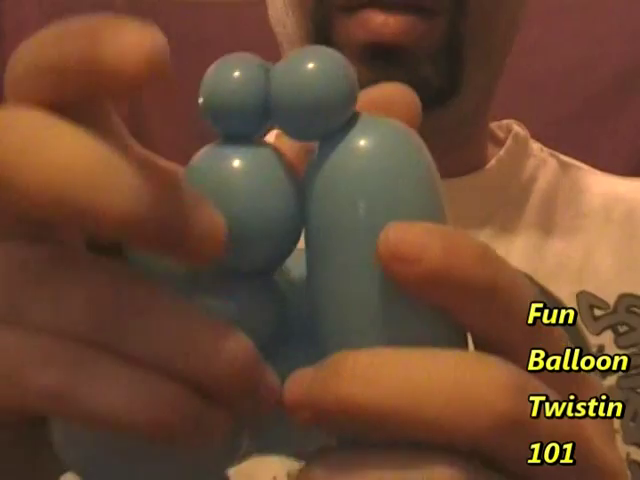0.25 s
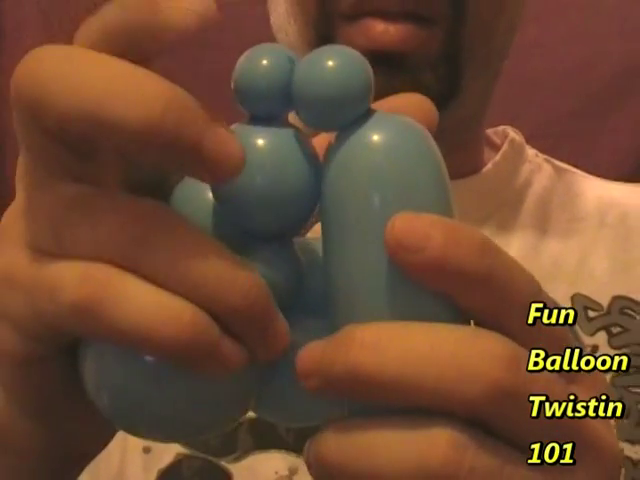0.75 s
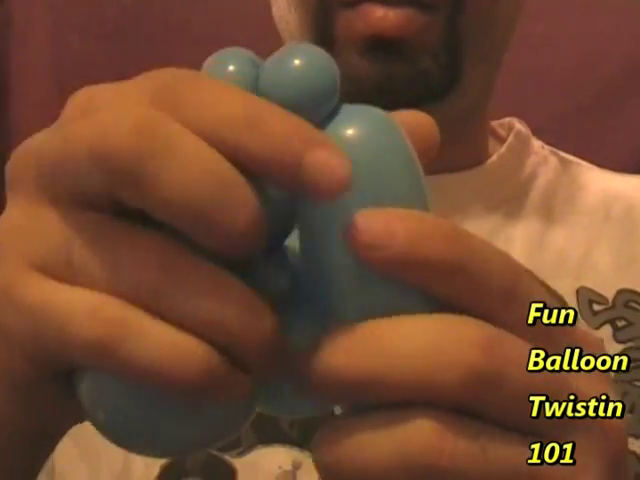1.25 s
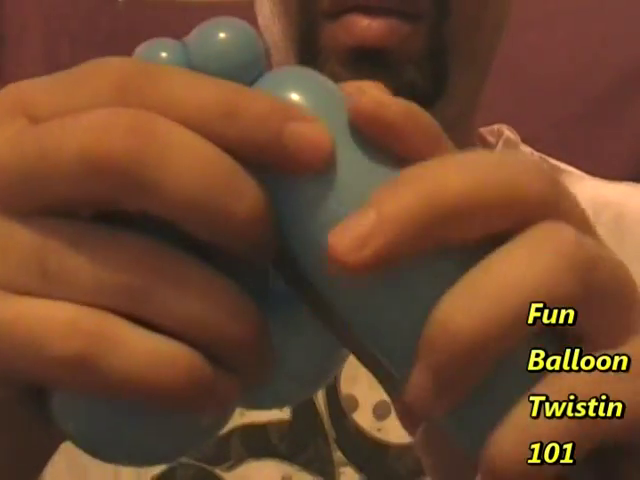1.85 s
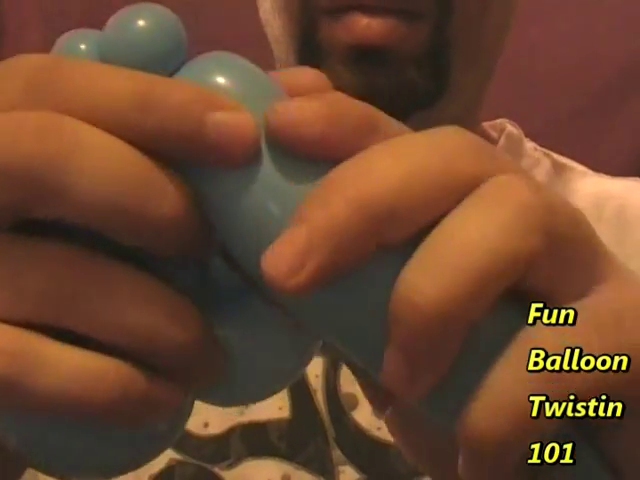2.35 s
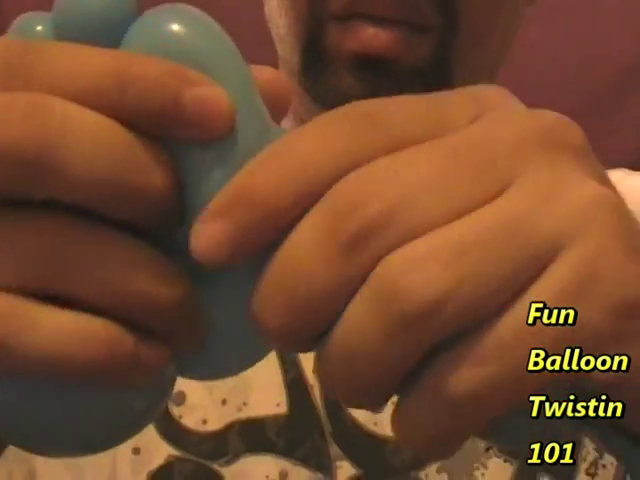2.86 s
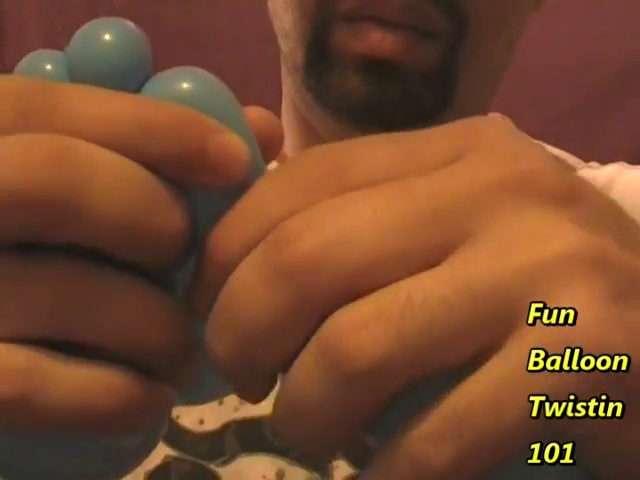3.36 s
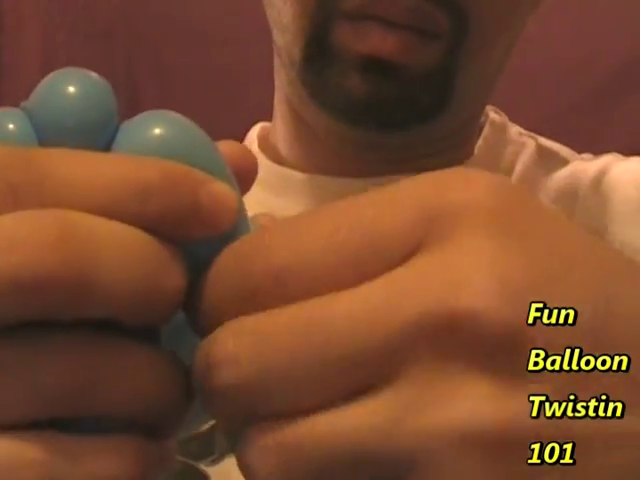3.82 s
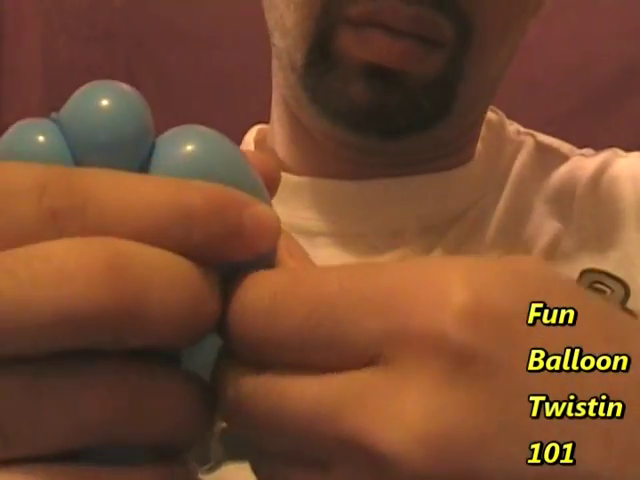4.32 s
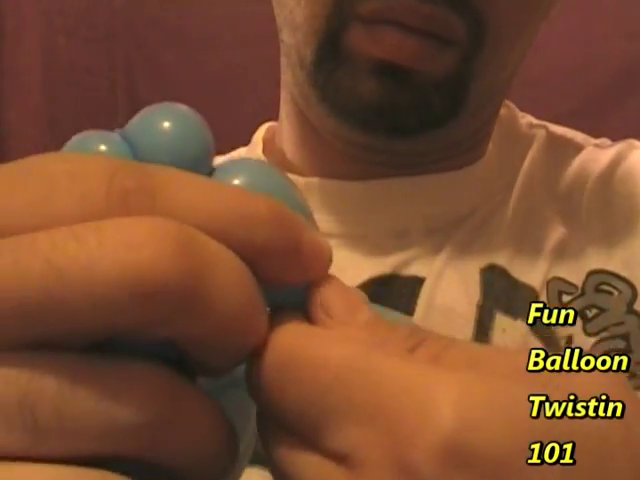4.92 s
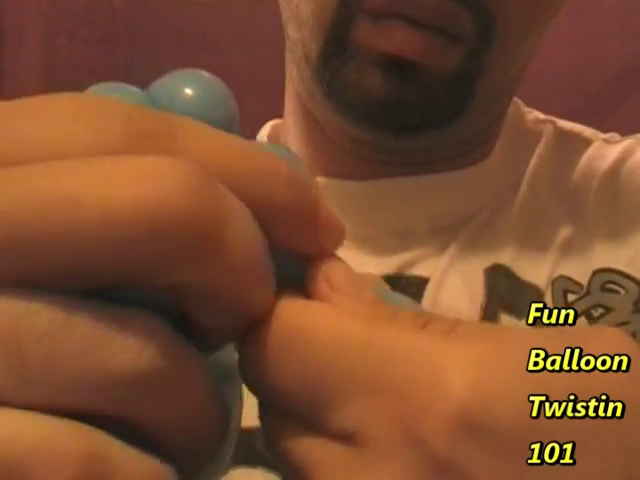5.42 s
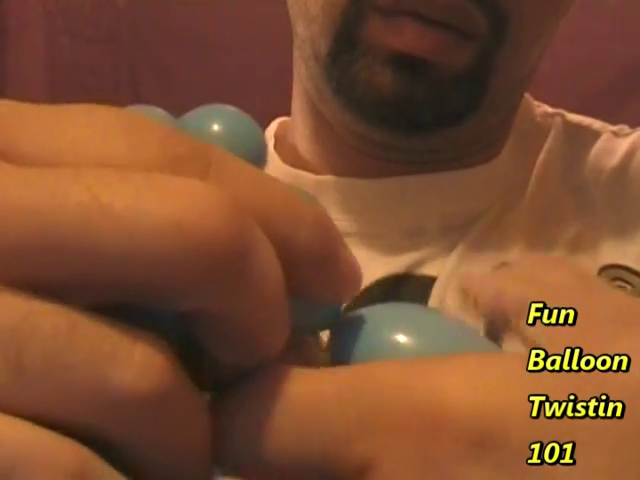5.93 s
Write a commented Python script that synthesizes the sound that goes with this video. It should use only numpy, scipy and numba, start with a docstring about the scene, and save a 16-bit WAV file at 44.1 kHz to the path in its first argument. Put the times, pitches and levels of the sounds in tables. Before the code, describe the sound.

A long latex balloon is gripped and twisted close to a stereo microphone in a small, fairly dry room. Soft hollow rubs and scattered ticks come first, with one sharp snap before a near-quiet gap. Then strong creaks and squeaky rubs follow almost without pause, thin into brighter crackle, nearly fade, and return in a loud cluster of snaps and rubbing.

```python
"""A small, fairly dry room: fingers squeeze and twist a long latex balloon close to two microphone ports.
The rubber sticks and slips, and each slip excites short, heavily damped modes of the taut skin.
Uneven slips make the rubbing and crackle, single hard ones snap, regular runs creak and squeak.
Brief gliding sines are sung notes; low judders thump the body. Air modes add a hollow ring, and a short
noise tail and a steady room tone surround it all."""
import sys
import numpy as np
from scipy import signal
from scipy.fft import rfft, irfft
from scipy.io import wavfile
from scipy.ndimage import uniform_filter1d
from numba import njit

SR = 44100
rng = np.random.default_rng(int(sys.argv[2]) if len(sys.argv) > 2 else 0)


def output_pcm(signal):
    """Save a mono or channel-first signal as 16-bit PCM at the path in sys.argv[1].

    Samples are clipped to [-1, 1] before scaling.
    """
    pcm = np.clip(np.atleast_2d(signal).T, -1, 1) * 32767
    wavfile.write(sys.argv[1], SR, np.round(pcm).astype(np.int16))


N = 272538  # length [samples]
SLIP_SPAN_S = .004  # reference span that ties slip level to slip rate


def undb(db):
    """Turn decibels into an amplitude gain."""
    return 10 ** (np.asarray(db) / 20)


def on_log_axis(hz, points, axis=1):
    """Read one column of a (frequency [Hz], ..) table, interpolating along log frequency."""
    points = np.array(points, float)
    return np.interp(np.log(np.maximum(hz, 1)), np.log(points[:, 0]), points[:, axis])


def coloured(x, points):
    """Filter a sound by a (frequency [Hz], level [dB]) table and bring it to rms 1."""
    size = x.shape[-1]
    gain = undb(on_log_axis(np.fft.rfftfreq(size, 1 / SR), points))
    y = irfft(rfft(x) * gain, size)
    return y / np.sqrt(np.mean(y ** 2))


def room_tone():
    """Low steady noise of the still room, independent at each port."""
    # spectrum shape of the still room: (frequency [Hz], relative level [dB per Hz])
    tone_spectrum = [(25, -13.5), (70, -1), (140, -2.5), (200, -0.5), (330, -5), (420, -8.5), (1000, -12),
                     (1500, -17), (5000, -26.5), (15000, -45)]
    level_db = -54  # rms
    return undb(level_db) * coloured(rng.standard_normal((2, N)), tone_spectrum)


def room(x, wet_db, t60_s, side_db, build_s):
    """Hands, chest and near walls return a short dense tail, nearly the same at both ports."""
    t = np.arange(SR // 3) / SR
    noise = rng.standard_normal((2, len(t)))
    fade = (1 - np.exp(-t / build_s)) * np.exp(-np.log(1000) * t / t60_s)
    # tail colours: (frequency [Hz], relative level [dB])
    mid = coloured(noise[0], [(100, 26), (400, -3), (1500, 6.5), (4000, 5), (8000, 2), (15000, 0.0)])
    side = coloured(noise[1], [(100, -20.5), (1000, 3.0), (3000, 0.0), (8000, 7.5), (15000, 7)])
    side = side * undb(side_db)
    tail = np.array([mid + side, mid - side]) * fade / np.sqrt(np.sum(fade ** 2))
    return x + signal.fftconvolve(x[None], undb(wet_db) * tail, axes=1)[:, :N]


def air(x):
    """The skin drives a few narrow air resonances, which give the low slips their hollow ring."""
    # air in and round the balloon: (frequency [Hz], width [Hz], added level [dB])
    air_modes = [(190, 34, 4), (345, 24, -1), (496, 36, -13), (790, 60, -9)]
    hollow = 0
    for hz, width, db in air_modes:
        hollow = hollow + undb(db) * signal.lfilter(*signal.iirpeak(hz, hz / width, fs=SR), x)
    return x + hollow


@njit
def ring(times, hz, size, rise):
    """Heavily damped modes, one row a slip: each swells for its rise time and dies away."""
    out = np.zeros(N)
    for e in range(len(times)):
        for m in range(hz.shape[1]):
            start = times[e, m]
            first = int(start * SR) + 1
            pole = (2j * np.pi * hz[e, m] - 1 / rise[e, m]) / SR
            # z is a decaying phasor, placed between samples at the exact start
            z, step = size[e, m] * np.exp(pole * (first - start * SR)), np.exp(pole)
            for i in range(max(first, 0), min(N, first + int(9 * rise[e, m] * SR))):
                out[i] += z.imag * (i / SR - start) / rise[e, m]
                z *= step
    return out


def grip(t):
    """Each push takes hold, swells or eases and lets go; gives level, lows, edge, main mode Hz and dB."""
    # pushes of the fingers along the rubber, levels ahead of each layer's own gain:
    # (start [s], end [s], attack [s], level [dB], swell from start to end [dB], hollow lows [dB],
    # sharp edge [dB], centre of the main mode [Hz], main mode against the others [dB])
    strokes = [(0.0, 0.095, 0.02, -32, 8, 15.5, -4, 814, -3.5),
               (0.111, 0.359, 0.023, -39, -2, 12.5, -4, 3440, -21),
               (0.441, 0.518, 0.021, -42, 0, 22, 5, 900, -2.5),
               (0.61, 0.724, 0.018, -38, 2, 17.5, 2, 950, -10),
               (0.785, 0.86, 0.019, -47, -8, 13, -6, 1080, -7.5),
               (1.218, 1.361, 0.054, -36, 2, 8, -4.5, 420, -10.5),
               (1.36, 1.456, 0.05, -22, 4, 18, 1, 1014, -3.5),
               (1.455, 1.658, 0.021, -29, -4, 5, -4, 910, -11),
               (1.683, 1.714, 0.022, -25.5, 0, 14, 8, 4103, -4),
               (1.734, 1.834, 0.021, -31, 2.5, 8, -2, 1454, -5),
               (1.845, 1.895, 0.01, -24.5, -3, 3, -2, 2470, -27),
               (1.908, 2.09, 0.019, -30, 1.5, 4, -2, 1369, -6),
               (2.121, 2.271, 0.018, -26, 13, -6, -6, 1482, -6.5),
               (2.33, 2.363, 0.0119, -46, 0, 16, -3, 398.5, -16),
               (2.348, 2.561, 0.11, -28.5, 3, -2.5, 0, 1400, -13),
               (2.565, 2.666, 0.024, -23.5, 2, 2.5, 0, 1831, -10.5),
               (2.697, 2.83, 0.03, -29, 2, -2.5, 1, 1424, -15),
               (2.85, 3.09, 0.13, -25, -10, 5.5, 2, 850.4, -9.5),
               (3.1, 3.16, 0.01506, -38, -7, 2, -2, 860, -12),
               (3.215, 3.32, 0.04, -33, 9, -12, 11, 1505, -10.5),
               (3.327, 3.487, 0.045, -25, -4, 10.5, 1, 1388, -10.5),
               (3.505, 3.571, 0.0206, -39, -5, -16, -4, 2294, -5.5),
               (3.679, 3.962, 0.038, -32, 0, 0.5, 6, 2927, -6.5),
               (3.988, 4.28, 0.027, -32, 1, 1, 2, 2566, -5.5),
               (4.28, 4.421, 0.034, -32, 0, -32, 9, 5100, -4),
               (4.424, 4.522, 0.021, -31, -1, -20, 11, 3393, -4),
               (4.537, 4.616, 0.03, -36, 3, -27, 9.5, 1671, -6),
               (4.652, 4.681, 0.013, -35.5, -2.5, -34, 5.5, 1384, -19),
               (4.719, 4.797, 0.021, -30.5, -5.5, -13, 8, 3810, -6),
               (4.822, 4.892, 0.02, -30, 7, -3, 2, 1573, -15.5),
               (4.966, 5.122, 0.051, -31, -4.5, -5, 7, 4317, -8),
               (5.242, 5.334, 0.0096, -47, 0, -21, 7, 2512, -4),
               (5.39, 5.573, 0.07, -34.5, 4, -27, 9, 5290, -6.5),
               (5.575, 5.74, 0.031, -24.5, 2, 2.5, 0, 1213, -6),
               (5.733, 5.92, 0.032, -26.5, -0.5, -1, -3, 680, -5.5),
               (5.97, 6.06, 0.02, -28.5, 0, 3, -1.5, 910, -14),
               (6.059, 6.113, 0.03, -35, 2, 10, -5, 1421, -4),
               (6.112, 6.165, 0.008, -23.5, -8.5, 4.5, -4.5, 902.5, -8.5)]
    # between pushes the gripped rubber creeps on, more when both hands wring it:
    # (start [s], end [s], level ahead of each layer's own gain [dB])
    holds = [(0.0, 0.51, -60), (1.25, 5.15, -45), (5.15, 5.43, -59), (5.429, 6.22, -43)]
    release_s = .023  # a push dies away once the finger stops
    start, end, attack, db, swell_db, *colour = np.transpose(strokes)[:, :, None]
    along = np.clip((t - start) / (end - start), 0, 1)
    hold = np.clip((t - start) / attack, 0, 1) ** 1.5
    envelope = hold * np.exp(-np.maximum(t - end, 0) / release_s)
    power = (envelope * undb(db + swell_db * (along - .5))) ** 2 + 1e-12
    total = power.sum(axis=0)
    creep = sum(((t >= first) & (t < last)) * undb(creep_db) ** 2 for first, last, creep_db in holds)
    # colours are averaged by power, so the strongest push dominates
    return [10 * np.log10(total + creep)] + [(power * c).sum(axis=0) / total for c in colour]


def patches(count, size=22):
    """Chance for each contact patch: where its modes lie, which way each swings, how late it starts."""
    return rng.random((count, 3, size))


def skin(times, db, low_db, edge_db, patch, cycles, travel_s):
    """Slips ring the skin: patch and push set the modes, a loose grip adds lows, a tight one edge."""
    # what the stretched skin radiates: (frequency [Hz], level [dB])
    skin_spectrum = [(100, -62), (250, -31), (340, -16.5), (500, -10), (700, -7.5), (950, -2), (1400, -0.5),
                     (2200, -3.5), (2900, -1.5), (5400, -11.5), (7700, -7.5), (11000, -21.5), (15500, -40)]
    count = patch.shape[2]
    hz = 115 * (14500 / 115) ** ((np.arange(count) + patch[:, 0]) / count)
    lows = on_log_axis(hz, [(450, 1), (950, 0.011)])  # share of low_db that each mode takes
    edge = on_log_axis(hz, [(2200, 0.014), (5500, 0.99)])  # share of edge_db
    mode_db = on_log_axis(hz, skin_spectrum)
    mode_db = mode_db + lows * np.reshape(low_db, (-1, 1)) + edge * np.reshape(edge_db, (-1, 1))
    power = hz * undb(mode_db) ** 2
    # above 2500 Hz the modes last more cycles
    rise = max(cycles, .2) / np.sqrt(hz * np.minimum(hz, 2500))
    # the first column becomes the main mode of the stretch, with its own rise time
    *_, main_hz, main_db = grip(times)
    hz[:, 0] = main_hz * np.exp(0.18 * (patch[:, 0, 0] - .5))
    power[:, 0] = power[:, 1:].sum(axis=1) * undb(main_db) ** 2
    rise[:, 0] = 0.82 / np.sqrt(hz[:, 0] * np.minimum(hz[:, 0], 1500))
    share = power / power.sum(axis=1, keepdims=True)
    size = np.sqrt(2 ** 3 * SLIP_SPAN_S * share / rise) * np.sign(patch[:, 1] - .5)
    # waves need time to run round the balloon, up to travel_s at 2 kHz and longer for low ones
    lag = travel_s * patch[:, 2] ** 1.7 * (2000 / hz) ** 0.3
    return ring(times[:, None] + lag, hz, size * undb(db)[:, None], rise)


def shudder(rate_hz, body_hz, rise_s, count=24):
    """When a whole finger judders along, each jerk thumps a low mode of the balloon."""
    # slow judders that shake the whole balloon: (start [s], end [s], level ahead of the low cut [dB])
    judders = [(2.95, 3.074, -42.5), (3.36, 3.48, -48.5)]
    out = 0
    for start, end, db in judders:
        chance = rng.standard_normal((count, 2))
        times = start + (np.arange(count) + 0.28 * chance[:, 0]) / rate_hz
        swell = np.sin(np.pi * np.clip((times - start) / (end - start), 0, 1))
        size = swell * undb(db) * np.sqrt(8 / (rate_hz * rise_s))
        hz = body_hz * np.exp(0.3 * chance[:, 1:])  # each jerk lands on a slightly different pitch
        out = out + ring(times[:, None], hz, size[:, None], np.full((count, 1), rise_s))
    return out


def chirps(overtone_db):
    """Slipping briefly locks to one mode of the skin: a gliding sine with its octave."""
    # short sung notes, peak of the fundamental ahead of the body and room:
    # (start [s], length [s], first pitch [Hz], last pitch [Hz], peak [dB])
    notes = [(3.282, 0.023, 1365, 1055, -28), (3.293, 0.023, 1161, 1850, -20),
             (4.171, 0.0044, 1925, 813, -35), (4.217, 0.004, 1338, 821, -13.5),
             (4.268, 0.0047, 1630, 890, -34), (4.412, 0.00434, 1326, 881, -16),
             (5.965, 0.0056, 954.5, 772, -24), (5.982, 0.0076, 995, 870, -20)]
    out = np.zeros(N)
    for start, length, first_hz, last_hz, db in notes:
        size, i = max(int(length * SR), 2), int(start * SR)
        phase = 2 * np.pi * np.cumsum(np.linspace(first_hz, last_hz, size)) / SR
        tone = np.sin(phase) + undb(overtone_db) * np.sin(2 * phase)
        out[i:i + size] += undb(db) * np.hanning(size) * tone
    return out


def creaks(gain_db, jitter, scatter_db, wander, cycles, travel_s, count=64):
    """One patch slips again and again at a gliding rate, so its pulses are nearly alike."""
    # regular stick-slip runs: (start [s], end [s], first rate [Hz], last rate [Hz],
    # level ahead of gain_db [dB], hollow lows [dB], sharp edge [dB])
    runs = [(0.4575, 0.516, 62.65, 74.4, -38.5, 18, 3), (0.646, 0.689, 80.6, 140.5, -36.5, 20, -21),
            (1.405, 1.423, 400, 525, -21.5, 16, -10), (1.423, 1.45, 667, 448.5, -15.5, -5.5, -0.5),
            (1.69, 1.717, 772.6, 706.3, -23.5, -6, 3), (1.849, 1.876, 353.7, 188.7, -17, -15, -2.5),
            (1.885, 1.897, 361, 491, -20, -15, -1), (2.036, 2.08, 281.5, 170.3, -24.5, -11, 2.5),
            (2.156, 2.171, 276.4, 177.5, -23.5, -10, 2.5), (2.214, 2.271, 380, 218.6, -21, -13, 2.5),
            (2.268, 2.273, 1930, 1730, -8.5, -18, 6), (2.298, 2.304, 280, 331.4, -19, -23.5, 7),
            (2.606, 2.653, 261.4, 370.4, -21, 3, 3), (2.939, 3.015, 111.6, 148.8, -22.5, 3.5, -3),
            (3.022, 3.094, 98.8, 56, -28, 12, -15), (3.385, 3.429, 253, 322.6, -29, 12, -9),
            (3.7, 3.781, 93.5, 66.5, -29, -13, 12.5), (3.794, 3.975, 51.93, 85.1, -33.5, -11, 8),
            (4.051, 4.102, 69.74, 124.2, -29.5, -10, 22), (4.319, 4.405, 127.1, 193.4, -37, -18, 13),
            (4.466, 4.523, 165, 152, -37.5, -25, 22), (5.434, 5.495, 202.7, 152.1, -37, -16, 3),
            (6.115, 6.146, 557.7, 332.5, -18.5, 5, -6)]
    out = 0
    for start, end, first_hz, last_hz, db, low_db, edge_db in runs:
        chance, patch = rng.standard_normal((count, 2)), np.repeat(patches(1), count, axis=0)
        patch[:, 0] += np.clip(wander * rng.standard_normal(patch[:, 0].shape), -1, 1)
        t = np.arange(start, max(end, start + .002), 1 / SR)
        rate = np.geomspace(first_hz, last_hz, len(t))
        due, turns = np.arange(count) + jitter * chance[:, 0], np.cumsum(rate) / SR
        live = due < turns[-1] + .3
        times = np.interp(due[live], turns, t)
        # faster runs have weaker single pulses
        rate_db = 10 * np.log10(np.interp(times, t, rate) * SLIP_SPAN_S)
        each_db = db + gain_db + scatter_db * chance[live, 1] - rate_db
        # a slow creak slides further on each slip, so its pulses are longer
        spread_s = travel_s * np.sqrt(300 / first_hz)
        out = out + skin(times, each_db, low_db, edge_db, patch[live], cycles, spread_s)
    return out


def crackle(rate_hz, scatter_db, gain_db, tight_gain, extra_edge_db, cycles, travel_s, count=600):
    """Patches let go with sparse, uneven ticks; the tighter the grip, the more they stand out."""
    chance, patch = rng.standard_normal((count, 2)), patches(count)
    times = np.cumsum(np.exp(.5 * chance[:, 0])) / rate_hz
    live = times < N / SR
    db, low_db, edge_db, *_ = grip(times[live])
    db = db + gain_db + tight_gain * edge_db + scatter_db * np.tanh(chance[live, 1])
    return skin(times[live], db, low_db, edge_db + extra_edge_db, patch[live], cycles, travel_s)


def snaps(gain_db, cycles, travel_s):
    """The rubber lets go all at once: single hard slips."""
    # hard slips: (time [s], level ahead of gain_db [dB], hollow lows [dB], sharp edge [dB])
    hard_slips = [(0.1667, -33, 8, -21), (0.236, -30.5, 3, 13), (0.2617, -29, -3, 8), (0.335, -38, 2, 5),
                  (0.402, -33, 11, -13), (0.439, -35.5, 27, 3), (0.6029, -28.5, 21.5, -0.5),
                  (0.633, -27, 18, -5), (0.7154, -27, 9, -41), (0.7754, -9.5, -22, -0.5),
                  (0.8579, -37.5, 20, -10), (0.909, -33, 13, -7.5), (1.176, -41, 16.5, 0),
                  (1.2281, -36.5, 1, -6), (1.2592, -26.5, 14, -0.5), (1.2738, -24, 20.5, -8),
                  (1.302, -25.5, 12, -2), (1.3715, -19, 16, -7), (1.3877, -17.5, 28, -2),
                  (1.565, -23, 17.5, 1), (1.61, -19, 4, -0.5), (2.008, -22, 23, 11),
                  (2.116, -20.5, -27, -15), (2.197, -19, -8, 9), (2.59, -21.5, 7, -3),
                  (2.689, -20.5, -21, 3), (2.7853, -19.5, 0, -0.5), (2.8149, -25, -13, 15),
                  (2.867, -25, -21, 11), (2.9108, -28, -6, -6), (3.3545, -15.5, 9, -2),
                  (3.3693, -22.5, 4, 16), (3.385, -27, 2, -10), (3.478, -23, 0, 18), (3.559, -28.5, -20, 7),
                  (3.624, -32, -13, 21), (3.6533, -29.5, -44, 13), (3.6704, -28, -22, 11),
                  (4.0196, -21.5, -9, 3), (4.171, -25, 5, -14), (4.2632, -20.5, -9, -15),
                  (4.5025, -26, -22, 21), (4.7249, -30.5, -14, 25), (4.8246, -23, -8, 11.5),
                  (4.866, -22.5, -18, 2.5), (5.0064, -28, -11, 19), (5.0266, -22.5, 12, 18),
                  (5.1257, -32, -18, 6), (5.1707, -38, -9.5, -3), (5.249, -32, -30, 5),
                  (5.2867, -36, -24, -1), (5.3102, -32, -26, 6), (5.325, -32, -19, 9),
                  (5.4177, -36.5, -4, 6), (5.4765, -18.5, 1.5, 1), (5.5864, -13.5, -23, 0),
                  (5.611, -17.5, -10, 3), (5.663, -17, 4, 2), (5.6732, -15, 3, 0), (5.7205, -25, -5, 7),
                  (5.818, -20.5, 22, 9), (5.8481, -20, 11, -8), (5.8865, -17, 3, -4),
                  (5.9009, -21, 13, -16), (5.9156, -19, 10, 2), (5.9642, -30, -4, 11), (5.9809, -22, 14, 4),
                  (5.9976, -18, 15, 8), (6.0137, -26.5, 15, 3)]
    times, db, low_db, edge_db = np.transpose(hard_slips)
    return skin(times, db + gain_db, low_db, edge_db, patches(len(times)), cycles, travel_s)


def rubbing(rate_hz, gap_spread, scatter_db, gain_db, cycles, travel_s, count):
    """Uneven slips under the fingers come faster as the pressure grows and the grip tightens."""
    step_s = .001
    t = np.arange(0, N / SR, step_s)
    pressure_db, _, tight_db, *_ = grip(t)
    chance, patch = rng.standard_normal((count, 2)), patches(count)
    # rate_hz holds at -30 dB of pressure and a neutral edge
    rate = rate_hz * undb(.25 * (pressure_db + 30) + .15 * tight_db)
    gaps = np.exp(gap_spread * chance[:, 0] - gap_spread ** 2 / 2)
    due, turns = np.cumsum(gaps), np.cumsum(rate) * step_s
    live = due < turns[-1]
    times = np.interp(due[live], turns, t)
    db, low_db, edge_db, *_ = grip(times)
    # a big slip spends the tension that its neighbours would have had
    force = undb(scatter_db * chance[live, 1]) ** 2
    force = force / uniform_filter1d(force, size=13) / (np.interp(times, t, rate) * SLIP_SPAN_S)
    each_db = db + gain_db + 10 * np.log10(force)
    return skin(times, each_db, low_db, edge_db, patch[live], cycles, travel_s)


def scene():
    """Mix rubbing, crackle, snaps, chirps, creaks and shudders, then add air, room and room tone."""
    # travel_s spreads the modes of a slip in time; cycles sets how long they swell
    coarse = rubbing(rate_hz=180, gap_spread=0.54, scatter_db=4.0, gain_db=-3.5,
                     cycles=0.85, travel_s=0.001317, count=3000)
    fine = rubbing(rate_hz=700, gap_spread=.7, scatter_db=1, gain_db=-5,
                   cycles=0.86, travel_s=0.001023, count=6000)
    ticks = crackle(rate_hz=49, scatter_db=4.5, gain_db=-3.0, tight_gain=0.24, extra_edge_db=3,
                    cycles=0.8, travel_s=0.001126)
    balloon = coarse + fine + ticks
    balloon = balloon + snaps(gain_db=-1.5, cycles=0.85, travel_s=0.001147)
    balloon = balloon + chirps(overtone_db=-9.0)
    balloon = balloon + creaks(gain_db=-0.87, jitter=0.0504, scatter_db=0.5, wander=0.23,
                               cycles=0.6, travel_s=0.001186)
    balloon = balloon + shudder(rate_hz=120, body_hz=185.86, rise_s=0.0043)
    # so small a body radiates little below 196 Hz
    balloon = signal.sosfilt(signal.butter(5, 196, "high", fs=SR, output="sos"), balloon)
    heard = room(air(balloon), wet_db=-8.0, t60_s=0.15, side_db=-6, build_s=0.00012)
    return heard + room_tone()


def record(dry):
    """The two ports colour the sound differently; peaks clip at full scale, then the top is cut."""
    # the two microphone ports: (frequency [Hz], left minus right [dB], left leads by [radians])
    port_split = [(61, -5, 0.58), (260.5, 1.5, 0.72), (507, 1.5, 0.39), (1350, 2.5, -0.12),
                  (2400, .5, -0.21), (4360, -.5, -0.0096), (7340, -2, -0.4), (7740, -11, -1.05),
                  (8820, 1.5, 1.52), (10770, 5.5, 0.59), (12700, 1.5, -0.74)]
    top_hz = 16000
    hz = np.fft.rfftfreq(N, 1 / SR)
    sides = np.array([[.5], [-.5]])  # each port takes half of the difference
    gain = undb(sides * on_log_axis(hz, port_split, axis=1))
    ports = gain * np.exp(1j * sides * on_log_axis(hz, port_split, axis=2))
    heard = np.clip(irfft(rfft(dry) * ports, N), -1, 1)
    return signal.sosfilt(signal.ellip(8, .2, 70, top_hz, fs=SR, output="sos"), heard)


dry = scene()
out = record(dry)
output_pcm(out)
```